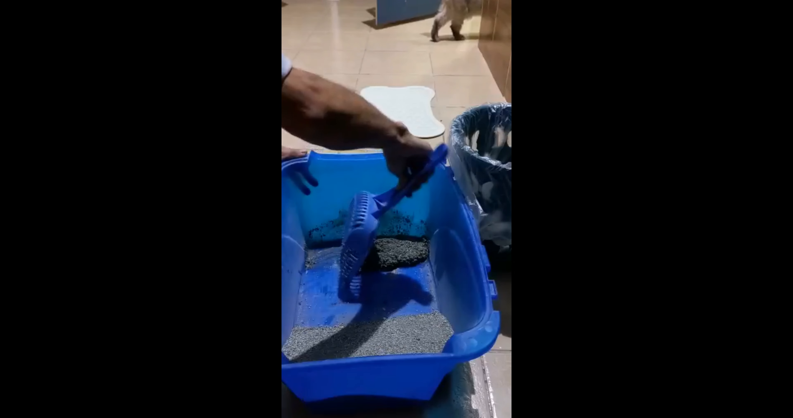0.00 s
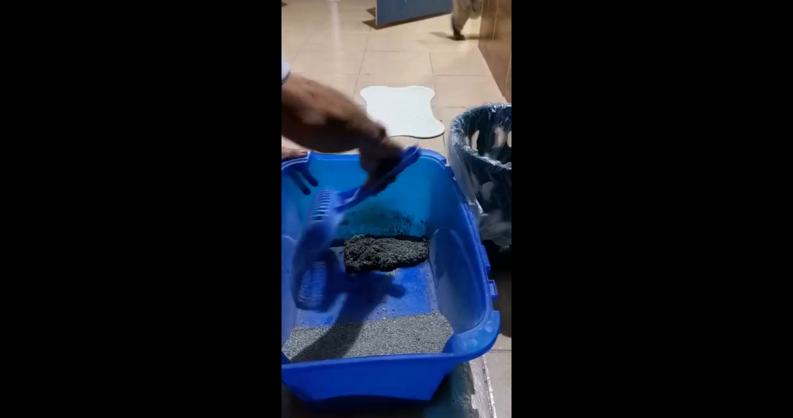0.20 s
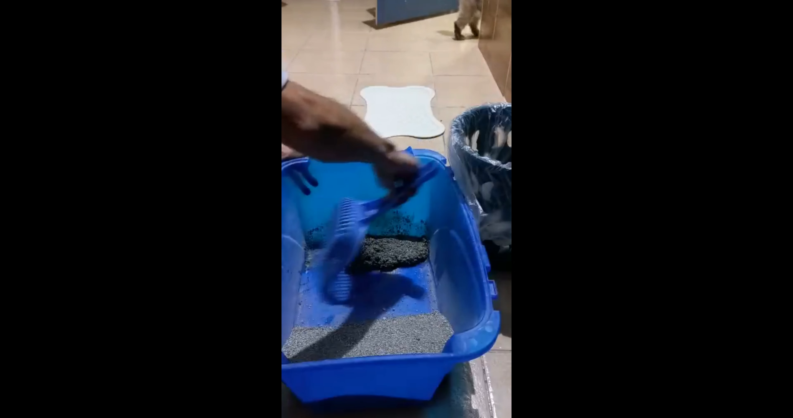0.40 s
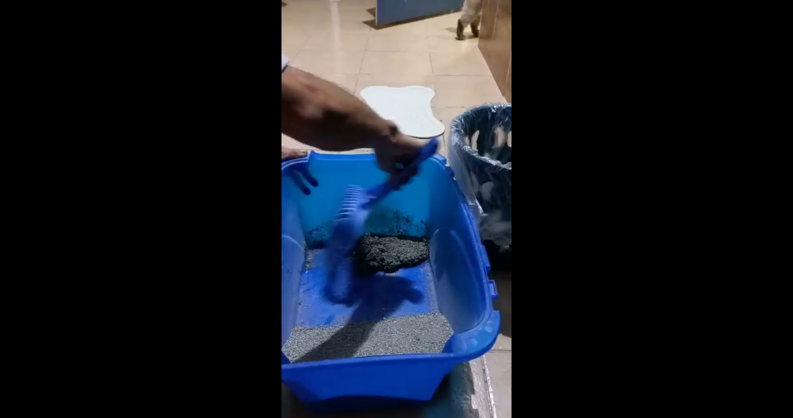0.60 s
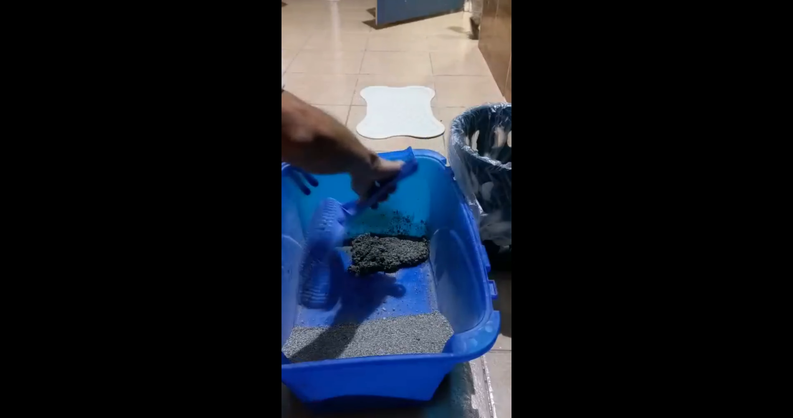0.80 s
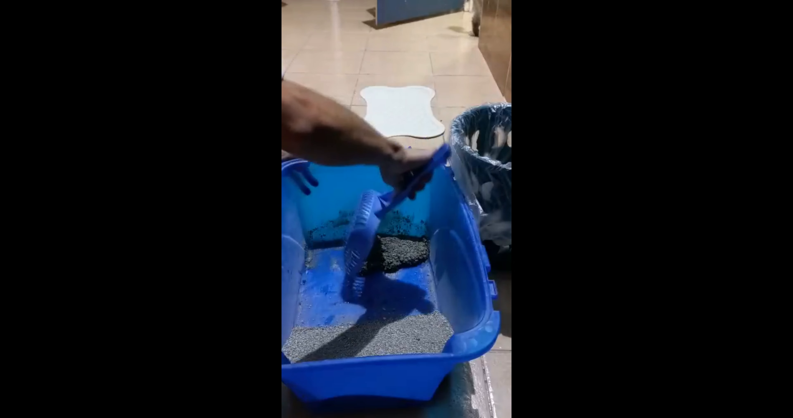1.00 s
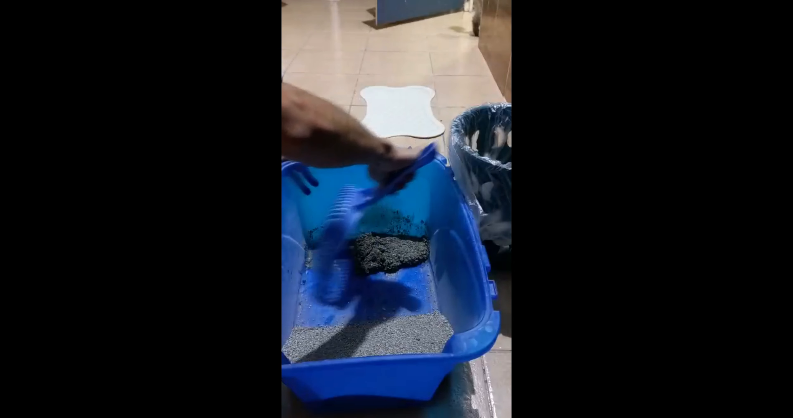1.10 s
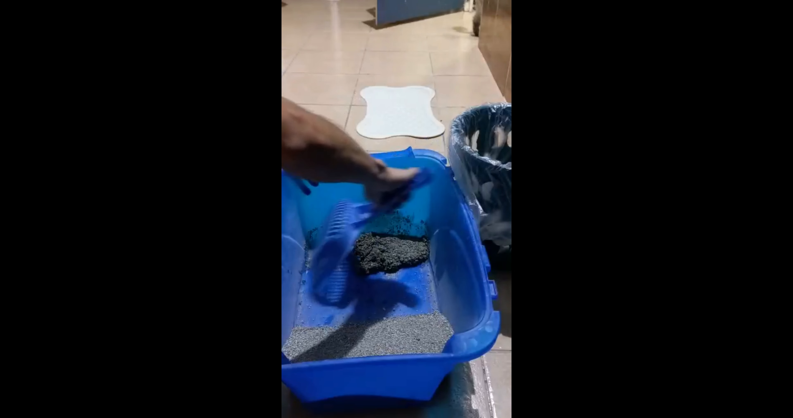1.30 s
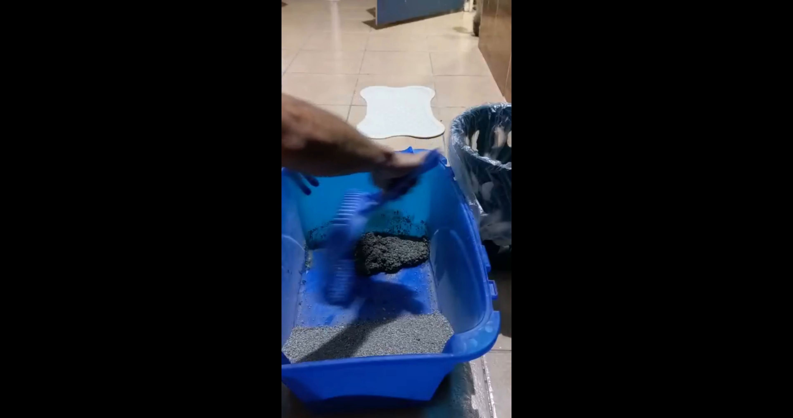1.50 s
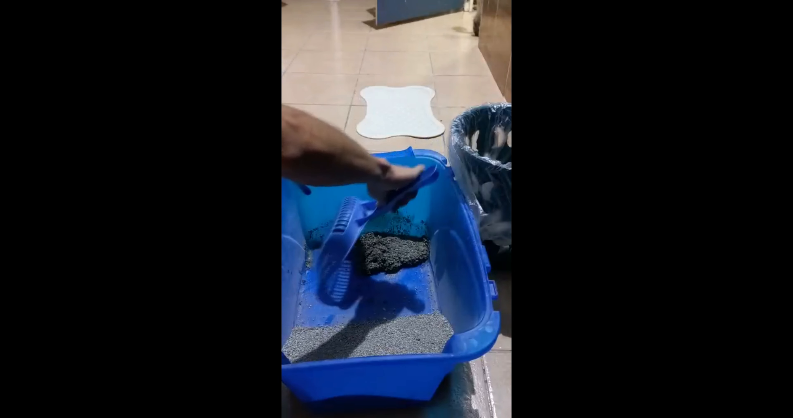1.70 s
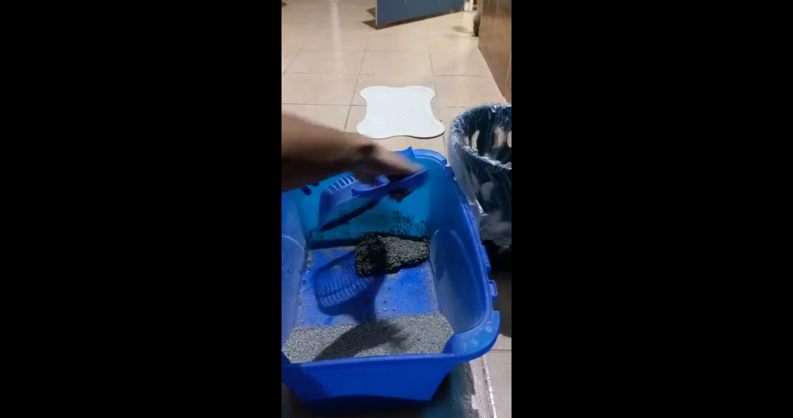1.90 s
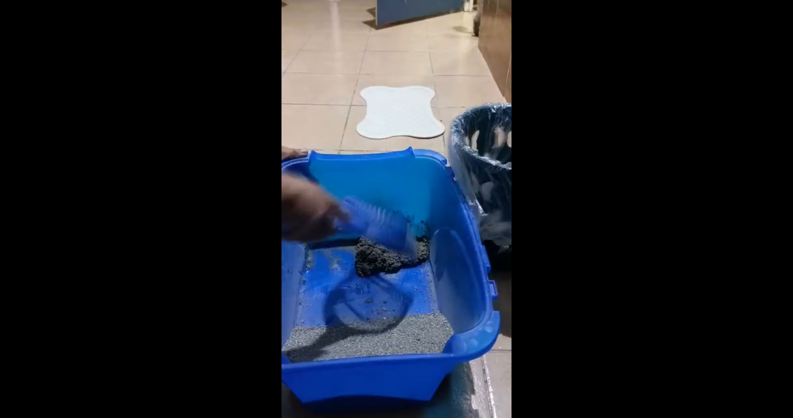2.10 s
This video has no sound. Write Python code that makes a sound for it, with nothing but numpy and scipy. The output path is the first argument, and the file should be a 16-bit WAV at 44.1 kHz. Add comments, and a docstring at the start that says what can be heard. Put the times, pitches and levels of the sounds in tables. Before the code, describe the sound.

Gritty cat litter scraped and sifted by a slotted plastic scoop in quick strokes, then it stops

```python
"""Scooping granular litter in a small tiled room

A plastic scoop is shaken to and fro through granular litter in a plastic tray. Random impacts make the
gritty hiss of grains through the slots and their rattle on the tray; the scoop's edge groans in
stick-slip tones, its blows ring the bottom's modes, and clumps snap as short noise bursts. At the end
the scoop lifts and spills its last grains. Diffuse echoes, air noise and a low hum make the room."""
import sys
import numpy as np
from scipy import signal
from scipy.fft import rfft, irfft
from scipy.io import wavfile

SR = 44100
rng = np.random.default_rng(int(sys.argv[2]) if len(sys.argv) > 2 else 0)


def unload_wav(signal):
    """Save mono or channel-first audio to the path in sys.argv[1] as 16-bit WAV at rate SR, clipped to [-1, 1]."""
    wavfile.write(
        sys.argv[1],
        SR,
        np.round(np.clip(np.atleast_2d(signal).T, -1, 1) * 32767).astype(np.int16),
    )


N = 97020
TIME = np.arange(N) / SR
FREQS = np.maximum(np.arange(N + 1) * SR / (2 * N), 1)

# impacts per second in each random train
GRAINS_PER_S, RATTLES_PER_S = 3400, 4500

# relative colour of grains drumming on the tray: (f/Hz, density/dB per Hz)
RATTLE_COLOUR = [(40, -32), (90, 1.5), (150, -36), (240, 0), (380, -13.5), (450, -1), (560, -0.5),
                 (750, 0.5), (1100, 5.5), (1520, 5), (1850, -1), (2800, -8), (5000, -29)]
# left-right likeness of the room's echoes and of the dragging scoop: (f/Hz, correlation)
ROOM_LIKENESS = [(350, 0.77), (900, 0), (2000, 0.02)]


def from_db(db):
    """Decibels to gain."""
    return 10 ** (np.asarray(db) / 20)


def rms_one(x):
    """Scale to unit level, over all channels together."""
    return x / np.sqrt(np.mean(x ** 2) + 1e-20)


def at_freqs(points):
    """Read a table on a log-frequency axis."""
    hz, value = np.transpose(points)
    return np.interp(np.log(FREQS), np.log(hz), value)


def shape(x, gain):
    """Filter by a smooth gain per frequency."""
    return irfft(rfft(x, 2 * N) * gain)[..., :N]


def colour(x, spectrum):
    """Filter a signal by a colour table and set it to unit level."""
    return rms_one(shape(x, from_db(at_freqs(spectrum))))


def stereo(pair, likeness):
    """Mix two unrelated signals to left and right with a given correlation per frequency."""
    correlation = np.clip(at_freqs(likeness), -.98, .98)
    mid = shape(pair[0], np.sqrt(1 + correlation))
    side = shape(pair[1], np.sqrt(1 - correlation))
    return np.array([mid + side, mid - side])


def pan(left_db):
    """Channel gains for a left-right level difference; positive leans left."""
    return from_db([[left_db / 2], [-left_db / 2]])


def drift(hz):
    """Random wander with spread 1, mostly slower than the given rate."""
    return rms_one(shape(rng.standard_normal(N), 1 / (1 + (FREQS / hz) ** 2) ** 2))


def grains(per_s, spread_db):
    """Two trains of random impacts, many small and a few large."""
    sizes = from_db(spread_db * np.minimum(rng.exponential(1, (2, N)), 4))
    signs = rng.choice([-1, 1], (2, N))
    return sizes * signs * (rng.random((2, N)) < per_s / SR)


def echoes(x, t60, delay_s):
    """Diffuse reflections: a decaying noise tail of unit energy, different for each ear."""
    t = TIME[:SR // 2]
    tail = rng.standard_normal((2, len(t))) * from_db(-60 * t / t60) * (t > delay_s)
    tail = tail / np.sqrt(np.sum(tail ** 2, axis=1, keepdims=True))
    return signal.fftconvolve(np.atleast_2d(x), tail, axes=1)[:, :N]


def room_noise():
    """Still air as coloured noise, with a low wavering hum."""
    # relative colour of the air: (f/Hz, density/dB per Hz)
    air_colour = [(25, -31), (40, -7), (78, -3.5), (150, -25), (260, -16), (355, -5), (450, -20.5),
                  (790, -24), (1040, -22.5), (1470, -33.5), (2500, -35.5), (6500, -32), (16000, -44.5)]
    # left-right likeness of the air: (f/Hz, correlation)
    air_likeness = [(80, 0.9), (400, 0.59), (1500, 0), (8000, 0.049)]
    air_db, hum_db, hum_hz = -74, -83, 75.5
    air = rms_one(stereo(colour(rng.standard_normal((2, N)), air_colour), air_likeness))
    hum = np.sqrt(2) * np.sin(2 * np.pi * hum_hz * TIME) * (1 + 0.31 * drift(13))
    return from_db(air_db) * air + from_db(hum_db) * hum


def room_echoes(dry):
    """Tiled walls return a dense coloured tail, here without the direct sound."""
    # how the tiles colour the tail: (f/Hz, gain/dB)
    tile_colour = [(60, -22), (200, -7), (400, -1), (700, 5), (1400, -8.5), (2000, -5), (6000, 1),
                   (16000, -7.5)]
    room_db = -11
    tail = stereo(echoes(dry, t60=.28, delay_s=0.00636), ROOM_LIKENESS) / np.sqrt(2)
    return shape(tail, from_db(room_db + at_freqs(tile_colour)))


def thin_ring():
    """A faint thin tone swells as the scoop is lifted clear, then holds."""
    start_s, rise_s, ring_hz, ring_db = 2.11, 0.036, 1042, -86
    swell = np.clip((TIME - start_s) / rise_s, 0, 1)
    return from_db(ring_db) * swell * np.sqrt(2) * np.sin(2 * np.pi * ring_hz * TIME)


def rustle():
    """Small impacts as grains shift faintly in the lifted scoop."""
    # loudness of the rustle: (t/s, level/dB)
    rustle_levels = [(2.0, -110), (2.08, -83.5), (2.2, -83)]
    # its relative colour: (f/Hz, density/dB per Hz)
    rustle_colour = [(2000, -4), (4500, -10), (6800, -4), (10000, -15), (16000, -20)]
    level = from_db(np.interp(TIME, *np.transpose(rustle_levels)))
    return level * colour(grains(GRAINS_PER_S, spread_db=3), rustle_colour)


def drag():
    """The scoop's belly drags on the bottom: dull rubbing of plastic on plastic under the strokes."""
    # loudness of the drag before panning: (t/s, level/dB)
    drag_levels = [(0, -56.5), (0.08, -83), (0.13, -64), (0.19, -73), (0.33, -54), (0.38, -68), (0.6, -65),
                   (0.85, -63.5), (1.05, -62), (1.28, -53), (1.35, -67), (1.66, -56.5), (1.85, -59),
                   (1.91, -71.5), (2.0, -88)]
    # its relative colour: (f/Hz, density/dB per Hz)
    drag_colour = [(30, -38), (70, -8), (130, -28.5), (180, -6.5), (280, -9.5), (370, 1.5), (450, -9.5),
                   (540, -2), (750, -9), (1400, -11), (1900, -41)]
    rub = stereo(colour(grains(RATTLES_PER_S, spread_db=2.5), drag_colour), ROOM_LIKENESS)
    return pan(left_db=5.5) * from_db(np.interp(TIME, *np.transpose(drag_levels))) * rms_one(rub)


def ticks():
    """Coarse grains and clumps snap against scoop and tray: noise bursts that die in milliseconds."""
    # the snaps, levels at their onset before panning: (t/s, level/dB, centre f/Hz, sharpness Q)
    snaps = [(0.267, -51, 4700, 2), (0.303, -47, 5100, 3.5), (0.317, -49.5, 5200, 4),
             (0.915, -44, 9000, .6), (0.940, -43, 9000, .6), (1.117, -51, 11000, 1), (1.168, -43, 3800, 4),
             (1.213, -42.5, 7000, .4), (1.342, -36, 1200, 1), (1.400, -38, 1100, 1),
             (1.486, -46, 4700, 2.5), (1.667, -39, 6000, .3), (1.803, -48, 1100, 1.5)]
    decay_s = .0045  # time constant
    noise, out = rng.standard_normal((2, N)), 0
    for s, db, hz, sharpness in snaps:
        band = 1 / (1 + (sharpness * (FREQS / hz - hz / FREQS)) ** 2)
        crack = rms_one(shape(noise, band))
        out = out + from_db(db) * crack * (TIME >= s) * np.exp(-np.abs(TIME - s) / decay_s)
    return pan(left_db=-2.5) * out


def bumps(scatter_db=3.0):
    """The scoop bumps the tray; each blow rings the bottom's modes with strengths of their own."""
    # the blows, before random scatter: (t/s, strength/dB, extra below 200 Hz/dB)
    blow_list = [(0.203, -52, -1), (0.246, -45.5, 10), (0.259, -50.5, 15), (0.282, -46, 9.5),
                 (0.735, -51, 18), (0.762, -57, 16), (0.815, -56, 13), (0.924, -47, -25), (0.977, -48.5, 8),
                 (1.129, -48, -13), (1.220, -45, 6), (1.399, -45, 7), (1.416, -56.5, 3.5), (1.701, -49, 1),
                 (1.803, -48, -2), (1.819, -47, 4), (1.840, -53.5, 13.5), (1.867, -63, 5)]
    # modes of the tray's bottom: (f/Hz, strength/dB, t60/s)
    bottom_modes = [(76.2, -18, 0.17), (108.2, -13.5, 0.17), (162.3, -21, 0.22), (196, -14, 0.082),
                    (245, -7.5, 0.24), (330, -10, 0.22), (404, -14, 0.17), (501, 0.5, 0.061),
                    (547, -3.5, 0.092), (695.6, -12, 0.23), (952, -20, 0.38), (1125, -8, 0.085)]
    bass_below_hz, radiates_above_hz, contact_hz = 200, 71, 1240
    s, db, bass_db = np.transpose(blow_list)
    out = np.zeros(N)
    for hz, mode_db, t60 in bottom_modes:
        strength_db = db + mode_db + bass_db * (hz < bass_below_hz)
        strength_db = strength_db + scatter_db * rng.standard_normal(len(s))
        blows = np.zeros(N)
        blows[(s * SR).astype(int)] = rng.choice([-1, 1], len(s)) * from_db(strength_db)
        # a two-pole resonator: decay per sample and turn per sample
        r, w = from_db(-60 / (t60 * SR)), 2 * np.pi * hz / SR
        out += signal.lfilter([0, np.sin(w)], [1, -2 * r * np.cos(w), r * r], blows + 1e-18)
    # a small bottom radiates little bass, a soft contact excites little treble
    return signal.lfilter(*signal.butter(2, [radiates_above_hz, contact_hz], "band", fs=SR), out)


def groans(jitter=0.024, rough=0.35, overtone_db=-24, hold=0.55):
    """The edge sticks and slips: short rough tones catch quickly, hold, and mostly sink as it slows."""
    # groans, slip rates before jitter: (t/s, length/s, level/dB, first slip rate f/Hz, last f/Hz)
    slips = [(0.201, 0.015, -44.5, 577, 498), (0.229, 0.039, -49.5, 565, 530), (0.246, 0.05, -46, 400, 328),
             (0.700, 0.018, -51, 525, 525), (0.716, 0.022, -47, 512, 494), (0.723, 0.018, -43, 406, 336),
             (0.806, 0.014, -49, 318, 320), (0.824, 0.015, -50.5, 356, 364),
             (0.844, 0.022, -55.5, 375, 368), (1.122, 0.025, -51, 397, 375),
             (1.123, 0.025, -52.5, 250, 248), (1.202, 0.033, -43, 562, 472), (1.213, 0.028, -46, 388, 335),
             (1.396, 0.043, -53.5, 247.6, 239), (1.398, 0.032, -50, 385, 343),
             (1.826, 0.065, -54.5, 529, 497)]
    out, wobble, grip = np.zeros(N), drift(340), drift(330)
    for s, length, db, first_hz, last_hz in slips:
        u = np.clip((TIME - s) / length, 0, 1)  # progress through the groan
        rate_hz = (first_hz + (last_hz - first_hz) * u) * (1 + jitter * wobble)
        phase = 2 * np.pi * np.cumsum(rate_hz * (u > 0)) / SR
        swell = np.abs(np.sin(np.pi * u)) ** hold
        tone = np.sin(phase) + from_db(overtone_db) * np.sin(2 * phase)
        out += from_db(db) * swell * (1 + rough * grip) * tone
    return np.sqrt(2) * out


def tray_bottom():
    """Groans and bumps leave the bottom together and reach the left side slightly later."""
    left_lag_s = 0.00021
    bottom = groans() + bumps()
    return pan(left_db=3.0) * np.array([np.interp(TIME - left_lag_s, TIME, bottom), bottom])


def walls(x):
    """The tray's walls add their resonances to the grains."""
    # wall resonances: (f/Hz, width/Hz, gain of the added band/dB)
    resonances = [(250.5, 9.5, 2), (374, 34, 8), (553.6, 13, -1.5), (778, 12, -2), (837, 17, -7.5),
                  (937, 4.7, 6.5), (1100, 17, -5), (1299.4, 27, 7.5), (1422, 49, -4), (1529, 21, -1),
                  (1686, 15, -5), (1812, 7.3, 2), (2210, 7.5, 8.5), (2412, 65, -7.5), (3230, 26, -1)]
    out = x
    for hz, width, db in resonances:
        out = out + from_db(db) * signal.lfilter(*signal.iirpeak(hz, hz / width, fs=SR), x)
    return out


def stroke_gains(curves):
    """Flow and rattle gains over time; each stroke dies quickly outside its span."""
    fade_db_per_s = 2509
    power = 0
    for rows in curves:
        s, flow_db, rattle_db = np.transpose(rows)
        outside_s = np.abs(TIME - np.clip(TIME, s[0], s[-1]))
        levels_db = np.array([np.interp(TIME, s, flow_db), np.interp(TIME, s, rattle_db)])
        power = power + from_db(levels_db - fade_db_per_s * outside_s) ** 2
    return np.sqrt(power + 1e-18)


def scratches(count=24):
    """Grains caught in the slots: narrow resonances flare up and die independently; unit level."""
    low_hz, high_hz, sharpness_q, swing_db = 1500, 6000, 34, 7
    out = 0
    for hz in np.geomspace(low_hz, high_hz, count):
        ring = signal.lfilter(*signal.iirpeak(hz, sharpness_q, fs=SR), rng.standard_normal((2, N)))
        out = out + rms_one(ring) * from_db(swing_db * np.minimum(drift(40), 2))
    return rms_one(out)


def sifting(curves, scratch, grit_db, hiss_db, grit_pan_db, hiss_pan_db):
    """Fine and coarse grains stream through the slots and echo in the tray; faster flow is brighter."""
    # relative colour of streaming grains: (f/Hz, density/dB per Hz)
    grit_colour = [(900, -37), (1600, -5), (2000, -3), (2600, -0.5), (3700, 2), (5000, -1.5), (6300, -8),
                   (8500, -14), (12000, -22.5), (16000, -44)]
    # relative colour of the fine hiss that fast flow adds: (f/Hz, density/dB per Hz)
    hiss_colour = [(3000, -5.5), (5000, -13.5), (7000, 4.5), (8500, -1.5), (11000, 4.5), (14000, 6),
                   (16000, 4.5)]
    # left-right likeness of the fine grains' direct sound: (f/Hz, correlation)
    grain_likeness = [(2000, -0.78), (4200, 0.52), (8000, -0.17)]
    coarse_per_s, coarse_spread_db, coarse_db, scratch_db = 420, 2.0, -5, -10.5

    flow = stroke_gains(curves)[0]
    # six trains, each echoing from its own spot, all clumping together
    spots = np.vstack([grains(GRAINS_PER_S, spread_db=4.5) for _ in range(3)])
    spots = spots * from_db(1.0 * drift(62))
    tray_echo = sum(echoes(spot, t60=0.11, delay_s=0) for spot in spots)
    direct = stereo(spots[:2] + spots[2:4] + spots[4:], grain_likeness)
    fine = tray_echo + from_db(1) * direct
    coarse_trains = grains(coarse_per_s, coarse_spread_db)
    coarse = sum(echoes(spot, t60=.004, delay_s=0) for spot in coarse_trains)

    hits = walls(rms_one(fine) + from_db(coarse_db) * rms_one(coarse))
    hits = hits + from_db(scratch_db) * scratch
    grit = from_db(grit_db) * pan(grit_pan_db) * colour(hits, grit_colour)
    hiss = from_db(hiss_db) * pan(hiss_pan_db) * colour(hits, hiss_colour)
    return flow * (grit + hiss * (flow / flow.max()) ** .5)


def rattling(curves, spectrum, likeness, level_db, pan_db):
    """Grains tumble over the thin plastic and make it ring."""
    clump_db, spread_db = .9, 3.1
    hits = grains(RATTLES_PER_S, spread_db) * from_db(clump_db * drift(55))
    drumming = rms_one(stereo(colour(hits, spectrum), likeness))
    return from_db(level_db) * pan(pan_db) * walls(drumming * stroke_gains(curves)[1])


def spill(scratch):
    """The lifted scoop spills its last grains through the slots and onto the tray."""
    # the spill, levels before trim and panning: (t/s, flow level/dB, rattle level/dB)
    spill_curve = [(1.64, -57, -68), (1.670, -54.5, -50), (1.703, -49, -42), (1.745, -55, -44.5),
                   (1.785, -65.5, -57), (1.797, -66, -60), (1.815, -70.5, -48), (1.85, -66, -59.5),
                   (1.954, -99, -81.5), (2.0, -99, -82)]
    # left-right likeness of the rattle: (f/Hz, correlation)
    likeness = [(100, 0.85), (600, 0.68), (1100, -0.36), (1500, -0.44), (2000, 0.058)]
    sift = sifting([spill_curve], scratch, grit_db=3.0, hiss_db=-7, grit_pan_db=2.0, hiss_pan_db=-8)
    return sift + rattling([spill_curve], RATTLE_COLOUR, likeness, level_db=-0.74, pan_db=2.0)


def last_pull(scratch):
    """One final pull streams grains through the slots and rattles the tray."""
    # the stroke, levels before trim and panning: (t/s, flow level/dB, rattle level/dB)
    pull_curve = [(1.477, -55, -46.5), (1.483, -44.5, -55), (1.50, -44, -43), (1.516, -46.5, -45.5),
                  (1.545, -45, -46.5), (1.58, -51, -55.5), (1.63, -60, -61)]
    # left-right likeness of the rattle: (f/Hz, correlation)
    likeness = [(100, 0.96), (450, 1), (800, 0.11), (1300, 0.17), (3000, .2)]
    sift = sifting([pull_curve], scratch, grit_db=1.0, hiss_db=-2.5, grit_pan_db=2.0, hiss_pan_db=-4.5)
    return sift + rattling([pull_curve], RATTLE_COLOUR, likeness, level_db=-3.5, pan_db=3.0)


def pulls(scratch):
    """Strokes back through the litter stream grains and rattle the tray."""
    # one curve per stroke, levels before trim and panning: (t/s, flow level/dB, rattle level/dB)
    pull_curves = [
        [(0.0, -65, -56), (0.01, -64.5, -63.5), (0.076, -84, -78), (0.104, -73.5, -64.5), (0.188, -99, -102),
         (0.19, -76, -83)],
        [(0.57, -70, -64), (0.584, -52.5, -59), (0.602, -50.5, -56), (0.64, -55, -50), (0.654, -49, -48.5),
         (0.695, -49, -55.5), (0.79, -69, -71)],
        [(1.05, -63.5, -65), (1.088, -50, -50), (1.112, -50.5, -49.5), (1.134, -52.5, -49.5),
         (1.168, -47.5, -50.5), (1.184, -53, -56), (1.22, -48.5, -54.5), (1.25, -57.5, -79)],
    ]
    # left-right likeness of the rattle: (f/Hz, correlation)
    likeness = [(100, 1), (400, 1), (700, 0.69), (1000, -0.48), (1300, -0.5), (3000, 0.069)]
    sift = sifting(pull_curves, scratch, grit_db=1.0, hiss_db=-8, grit_pan_db=1.5, hiss_pan_db=-10.5)
    return sift + rattling(pull_curves, RATTLE_COLOUR, likeness, level_db=2.5, pan_db=3.5)


def pushes(scratch):
    """Strokes forward stream grains and push a heap along the tray, which colours the rattle."""
    # one curve per stroke, levels before trim and panning: (t/s, flow level/dB, rattle level/dB)
    push_curves = [
        [(0.19, -109, -96), (0.202, -65, -59.5), (0.244, -60, -59), (0.37, -60.5, -74.5), (0.39, -50.5, -60),
         (0.42, -46.5, -44.5), (0.462, -49, -41.5), (0.488, -55.5, -53.5), (0.57, -75.5, -65)],
        [(0.79, -75, -81), (0.806, -59.5, -75), (0.854, -56, -67), (0.888, -49.5, -56), (0.894, -48, -53.5),
         (0.928, -46, -38), (0.976, -50, -43.5), (1.05, -72, -61)],
        [(1.25, -59, -69), (1.298, -53, -64.5), (1.328, -46.5, -45), (1.344, -47, -40.5), (1.38, -47, -44.5),
         (1.4, -49.5, -42), (1.456, -62, -60.5), (1.465, -75, -54)],
    ]
    # relative colour of the rattle with a heap pushed along: (f/Hz, density/dB per Hz)
    heap_colour = [(40, -19.5), (90, -1), (150, -13.5), (240, -6), (380, -3), (450, -3.5), (560, 4.5),
                   (750, 2), (1100, 6.5), (1500, 4), (2000, 1), (2800, -8.5), (5000, -27.5)]
    # left-right likeness of the rattle: (f/Hz, correlation)
    likeness = [(100, 0.68), (400, 0.86), (600, 0.56), (1000, -0.25), (1700, -0.23), (3000, -0.1)]
    sift = sifting(push_curves, scratch, grit_db=3.5, hiss_db=-1.5, grit_pan_db=0.3, hiss_pan_db=-5)
    return sift + rattling(push_curves, heap_colour, likeness, level_db=1.0, pan_db=2.5)


def swelling_bands(x, count=28):
    """Narrow bands of the strokes and the spill swell and fade at random, each on its own."""
    low_hz, high_hz, swing_db, rate_hz = 1400, 9000, 2.2, 45
    centres = np.log(np.geomspace(low_hz, high_hz, count))
    place = np.interp(np.log(FREQS), centres, np.arange(count))
    out = x
    for k in range(1, count - 1):
        band = shape(x, np.maximum(1 - np.abs(place - k), 0))  # a triangle between its neighbours
        out = out + band * (from_db(swing_db * drift(rate_hz)) - 1)
    return out


def scene():
    """Pushes and pulls, the final spill and the tray's own noises, in the room."""
    scratch = scratches()
    litter = swelling_bands(spill(scratch) + last_pull(scratch) + pulls(scratch) + pushes(scratch))
    dry = thin_ring() + rustle() + drag() + ticks() + tray_bottom() + litter
    return room_noise() + room_echoes(dry) + dry


def record(dry):
    """The top is cut steeply."""
    cutoff_hz = 15750
    return shape(dry, 1 / np.sqrt(1 + np.minimum(FREQS / cutoff_hz, 1.2) ** 300))


dry = scene()
out = record(dry)
unload_wav(out)
```